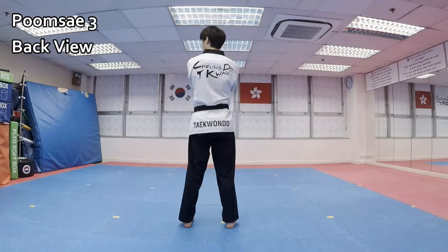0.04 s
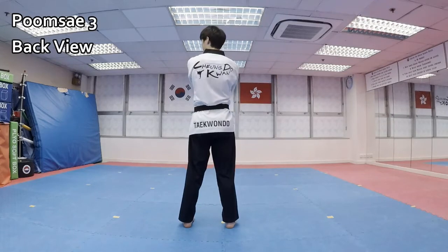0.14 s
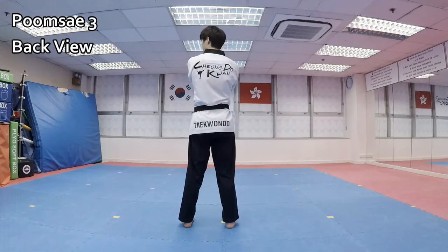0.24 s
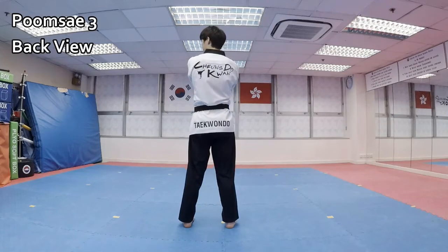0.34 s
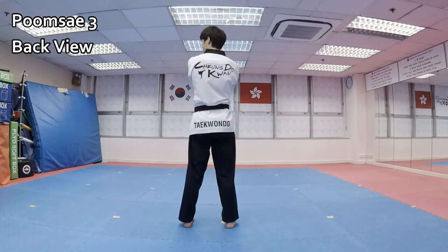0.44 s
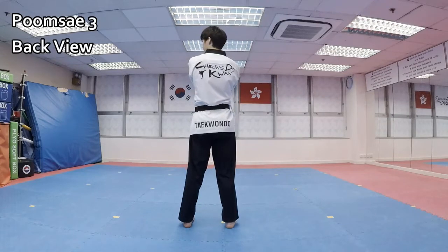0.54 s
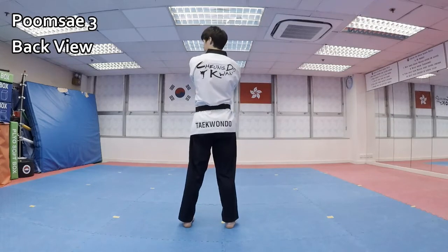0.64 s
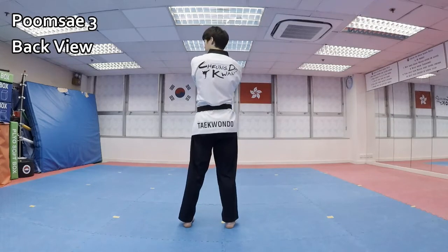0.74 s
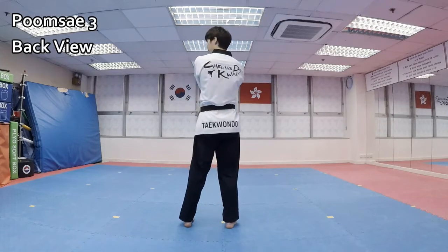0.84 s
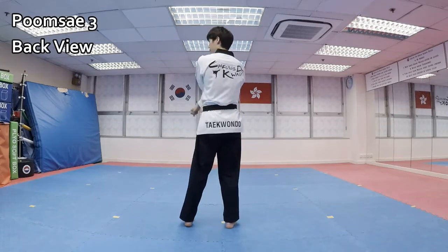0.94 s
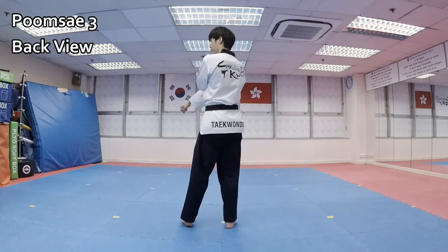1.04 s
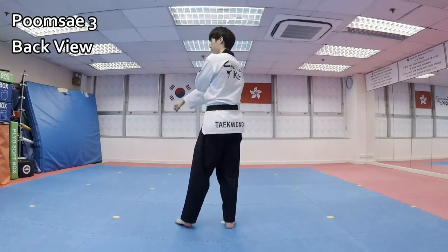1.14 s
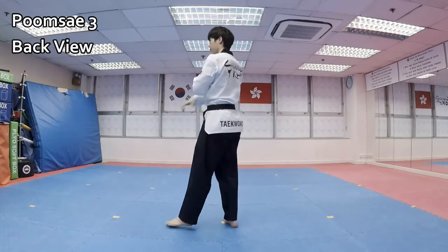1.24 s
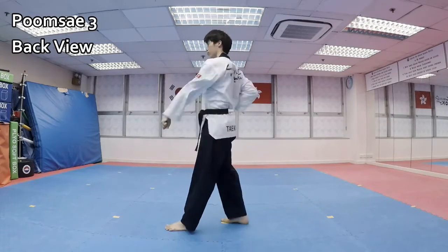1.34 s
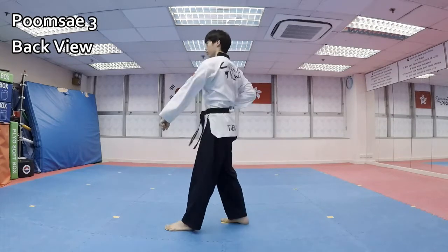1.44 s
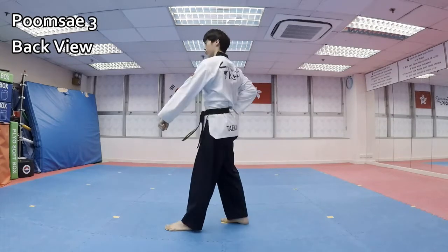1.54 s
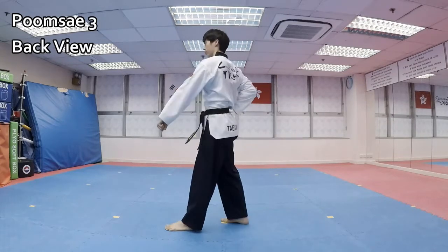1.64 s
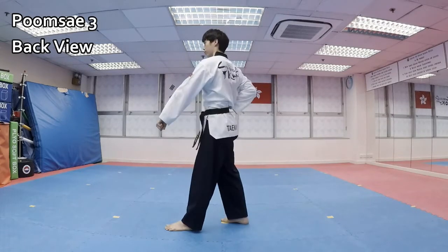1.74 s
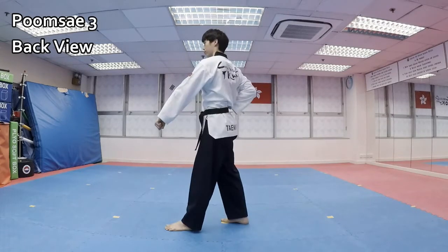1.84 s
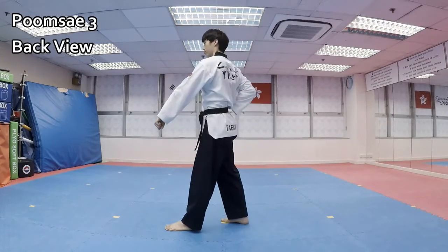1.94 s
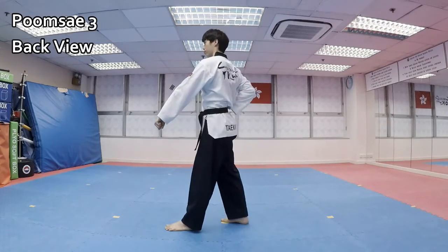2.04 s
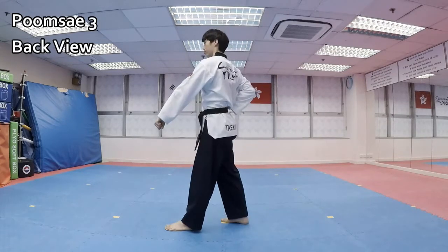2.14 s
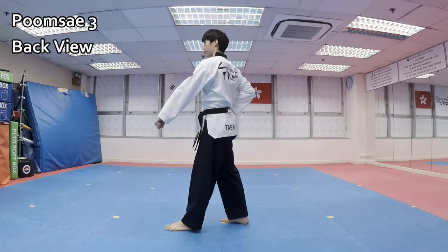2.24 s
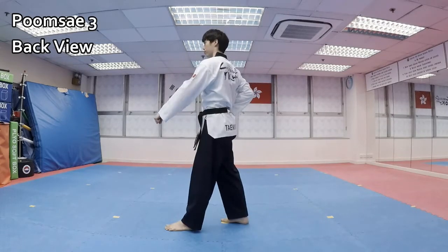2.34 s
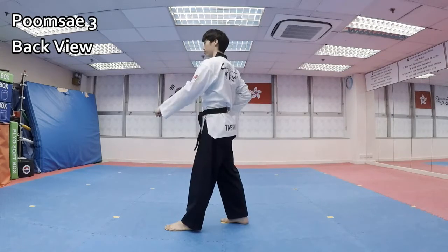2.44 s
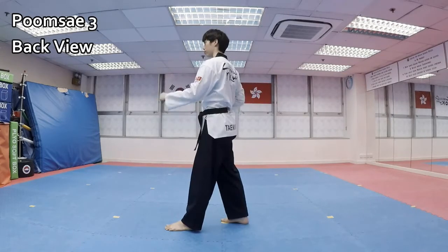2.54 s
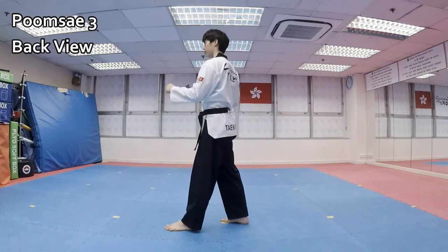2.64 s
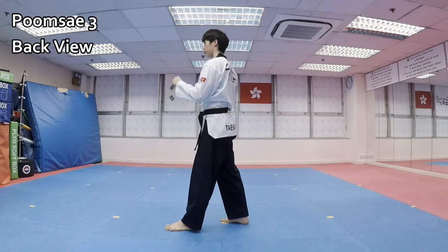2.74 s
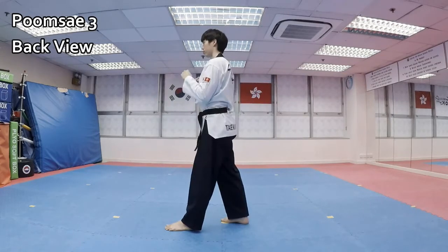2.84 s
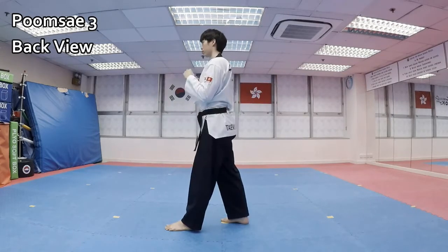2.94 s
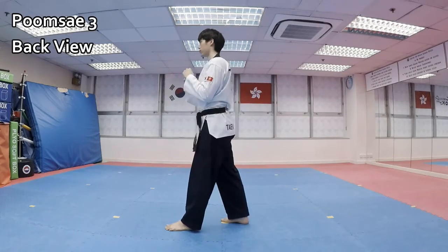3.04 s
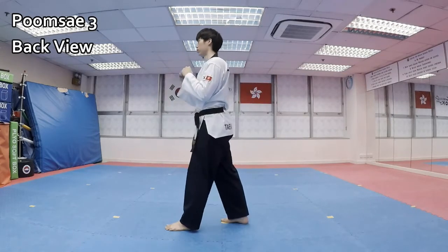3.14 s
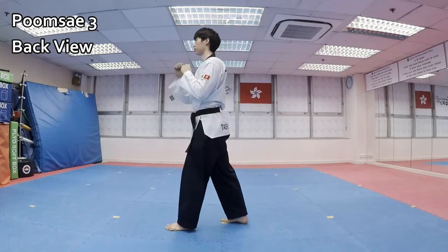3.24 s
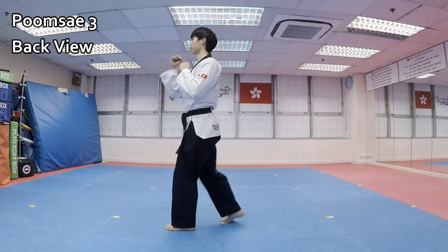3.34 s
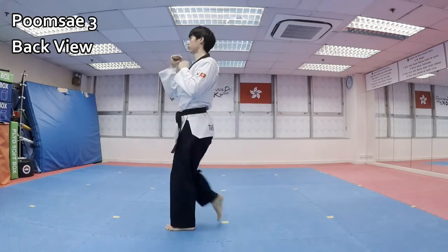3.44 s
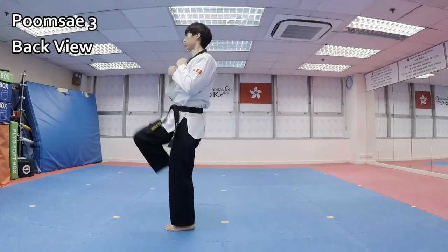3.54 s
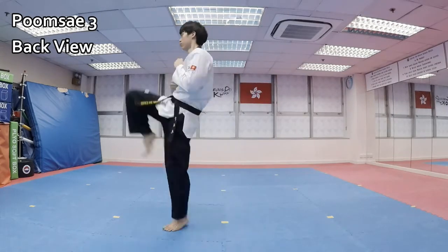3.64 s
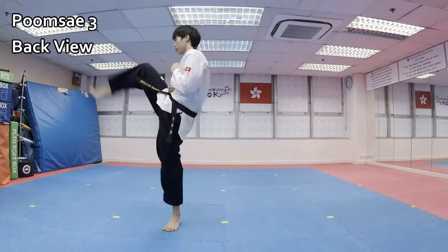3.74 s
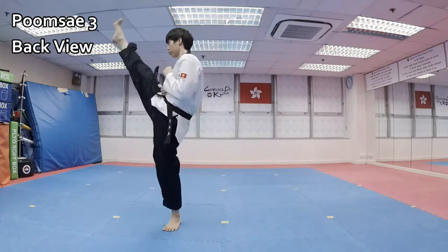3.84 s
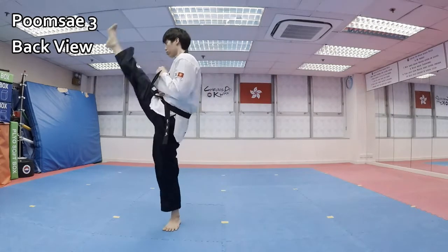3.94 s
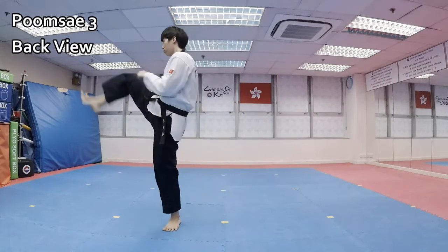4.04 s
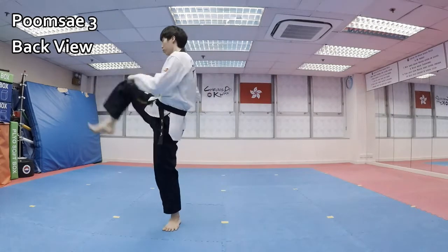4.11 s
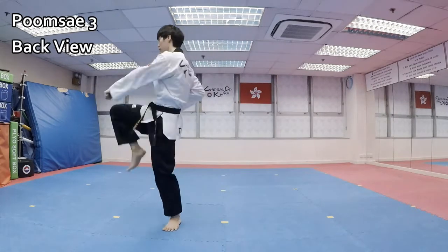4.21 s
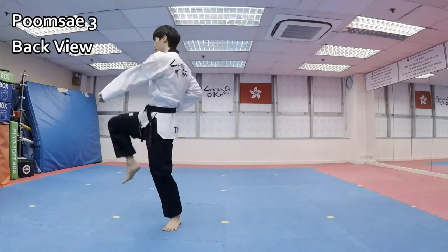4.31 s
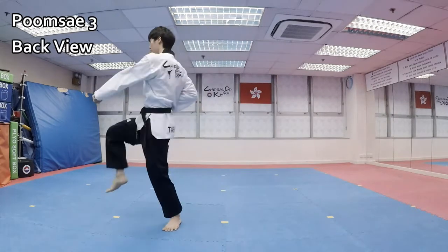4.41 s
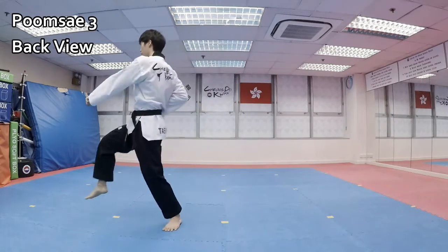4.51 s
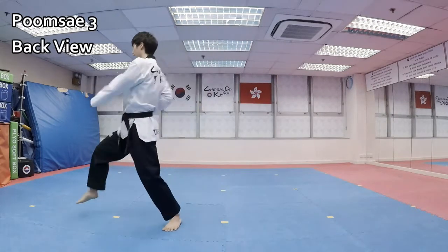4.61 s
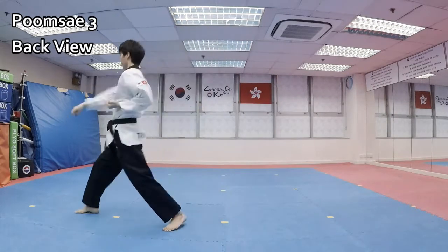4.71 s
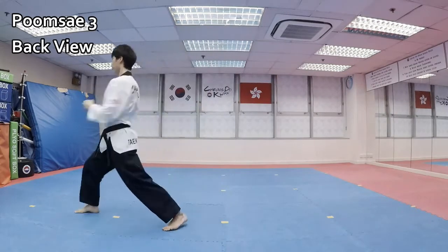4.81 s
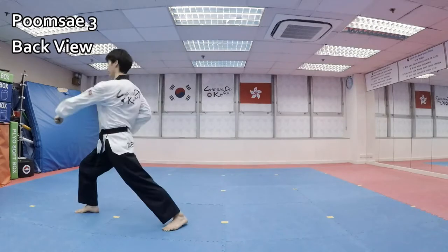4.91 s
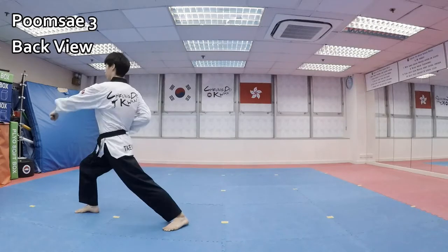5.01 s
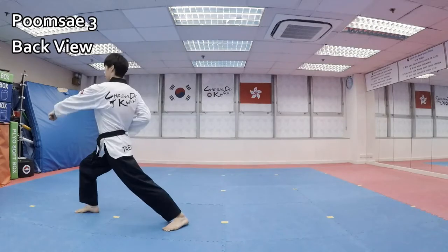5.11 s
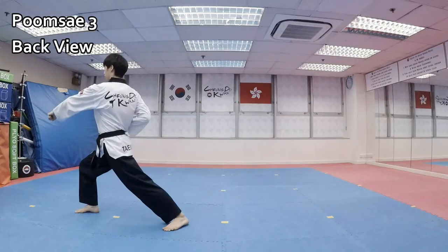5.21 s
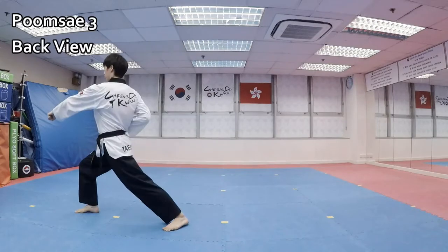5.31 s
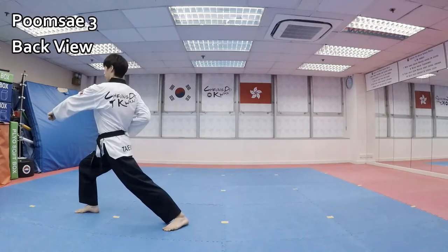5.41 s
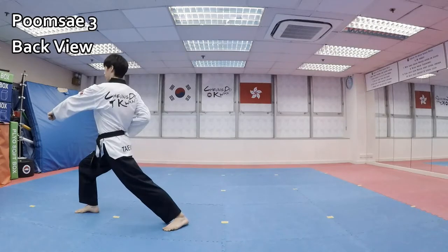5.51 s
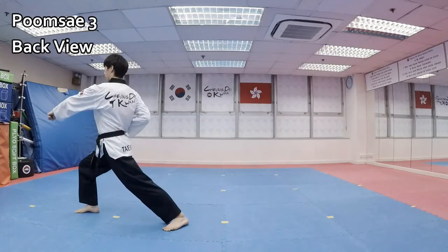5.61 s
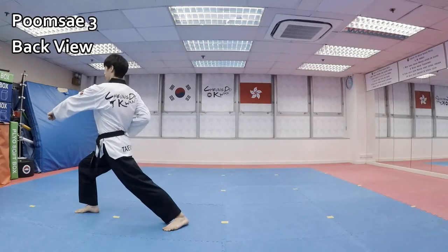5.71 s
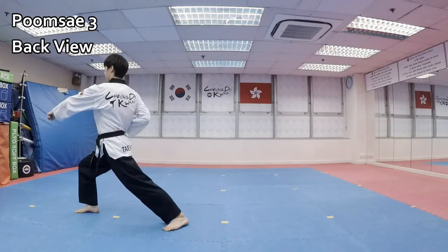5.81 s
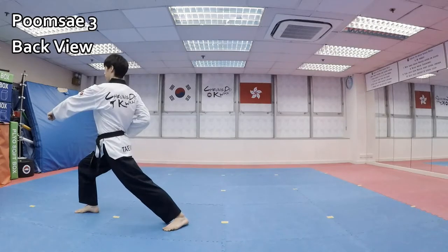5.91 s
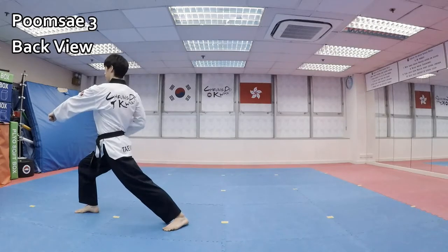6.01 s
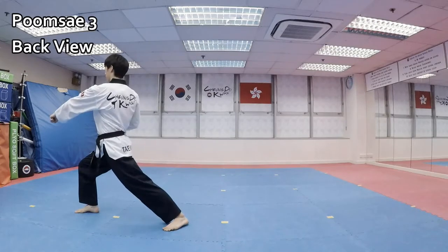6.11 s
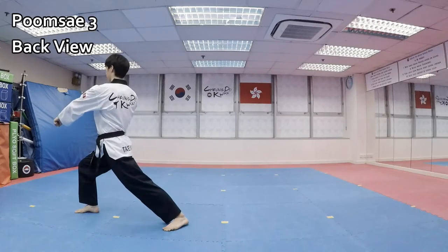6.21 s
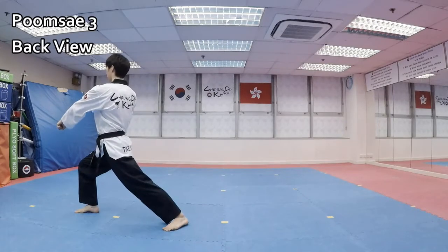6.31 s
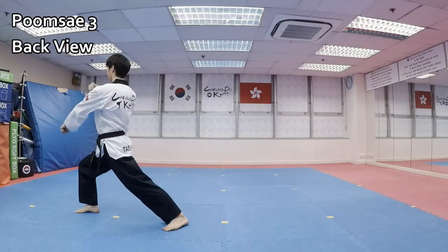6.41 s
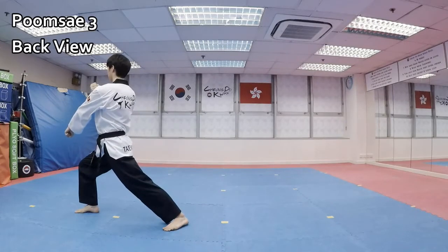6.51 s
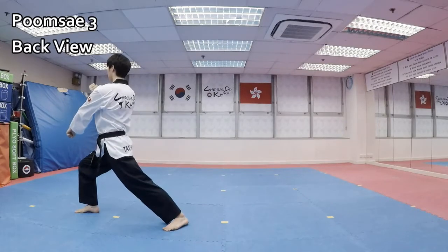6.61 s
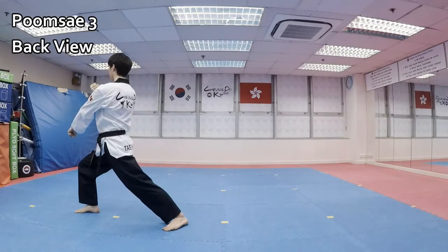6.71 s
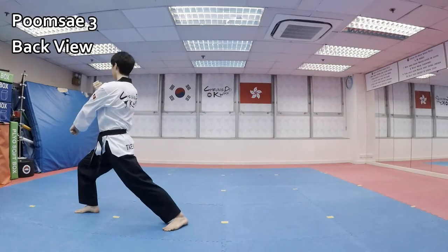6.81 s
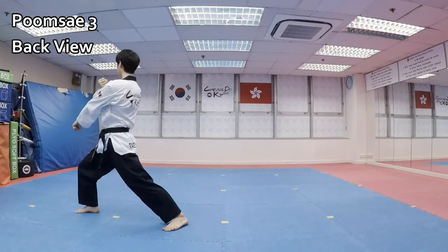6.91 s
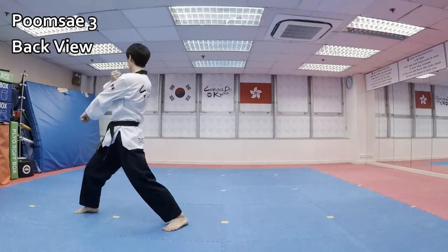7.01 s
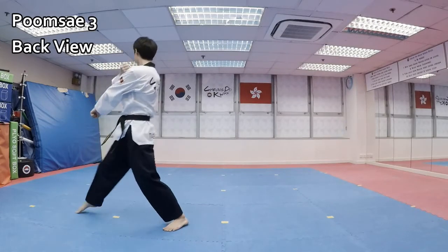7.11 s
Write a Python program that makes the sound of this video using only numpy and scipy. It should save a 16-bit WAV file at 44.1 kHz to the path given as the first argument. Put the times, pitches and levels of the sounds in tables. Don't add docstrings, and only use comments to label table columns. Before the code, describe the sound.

A small camera a few metres off hears heavy cotton cloth snapping, crackling and thumping softly against limbs: first a block, then a kick and a rapid cluster for the punch, and a last sharp flick at the end. Between them only tiny creases tick. A steady low boom of outside traffic swells and sinks under wavering engines and ventilation hiss, in a briefly reverberant room.

```python
import sys
import numpy as np
from scipy import signal
from scipy.fft import rfft, irfft, next_fast_len
from scipy.io import wavfile
from scipy.ndimage import map_coordinates

SR = 44100
rng = np.random.default_rng(int(sys.argv[2]) if len(sys.argv) > 2 else 0)


def decibels_to_gain(level_db):
    exponent = np.asarray(level_db, float) / 20
    return 10 ** exponent


def store_pcm(level_fs):
    pcm = np.round(np.clip(level_fs, -1, 1) * 32767).astype(np.int16)
    wavfile.write(sys.argv[1], SR, np.atleast_2d(pcm).T)


N = 315756

# fastest t/s, fade/s, rubbing level/dB, buckling level/dB
LIMB_STROKES = [(.875, .03, -50.5, -60), (1.04, 0.11, -51.5, -55), (1.13, 0.08, -56, -56),
                (1.203, 0.051, -47, -40), (1.264, 0.041, -37, -23), (1.295, 0.071, -39.5, -28.5),
                (2.99, .06, -50.5, -43.5), (3.06, 0.068, -61, -46), (3.2, .06, -48, -48.5),
                (3.36, .05, -50, -43), (3.47, 0.11, -45, -40), (3.569, 0.06, -39, -39),
                (3.63, 0.065, -48.5, -40), (3.689, 0.052, -42, -37), (3.756, 0.049, -48, -30),
                (3.81, 0.027, -47, -37), (3.861, 0.038, -37.5, -33), (4.052, 0.042, -49, -39.5),
                (4.14, .07, -52.5, -50.5), (4.31, 0.067, -61, -53), (4.46, 0.042, -54, -39.5),
                (4.606, 0.037, -58, -34), (4.68, 0.064, -34, -28.5), (4.75, 0.084, -44, -30.5),
                (4.88, 0.048, -49.5, -40.5), (5.02, 0.065, -59, -55), (5.96, 0.053, -56, -44.5),
                (6.99, 0.042, -48, -57), (7.099, 0.031, -35.5, -44), (7.155, .03, -45, -37)]
# f/Hz, level/dB per Hz
RUB_SPECTRUM = [(1200, -120), (2200, -5), (2900, -9), (3570, -2), (4900, -6), (6400, -1), (7800, -10),
                (10200, -22), (11100, -42), (14500, -32)]
# f/Hz, level/dB per Hz
CREASE_SPECTRUM = [(150, -120), (330, -23), (500, 0), (1050, -5.5), (1350, -6), (2200, -14), (3200, -20),
                   (7000, -120)]
# f/Hz, level/dB per Hz
FLAP_SPECTRUM = [(40, -120), (80, -3), (130, 1), (250, -2.5), (420, -2.5), (700, -17.5), (1500, -120)]
# t/s, tick level/dB, brightness/dB, pop level/dB, weave f/Hz
CLOTH_SNAPS = [(1.2002, -39, -14, -49, 3280), (1.2601, -23.5, -24, -22, 3440), (1.3293, -28, -5, -31, 4874),
               (3.1938, -47.5, -9, -31, 4270), (3.4, -48, -5, -33, 3548), (3.472, -37, -9, -39, 4400),
               (3.5203, -43, 2, -28.5, 3520), (3.5568, -21, -3.5, -24, 3478), (3.5934, -43, -11, -33, 3340),
               (3.7584, -51, -13, -26.5, 3075), (3.8031, -33, -20, -26, 5170), (3.8704, -33, 2, -24, 3200),
               (4.2927, -31.5, -5.5, -29, 3800), (4.4443, -37, -8, -35, 4586),
               (4.5916, -34, -6, -24.5, 3460), (4.6231, -35, -16, -26, 4270),
               (4.6462, -26.5, -16, -27, 3984), (4.6535, -25, -21, -25, 3560),
               (4.6662, -33, -23, -22, 3456), (4.6766, -28, -14, -30, 3480),
               (4.6917, -27.5, -2.5, -46, 3557), (4.7254, -42, 1, -27.5, 4150),
               (5.9551, -32, -7, -46, 4620), (7.088, -24, -3.5, -23.5, 4525)]
# t/s, tick level/dB, brightness/dB
CREASE_TICKS = [(0.885, -42, -6), (0.9596, -45, -3), (1.0253, -45, -2), (2.9702, -37.5, -24),
                (3.1427, -42, -7), (3.3402, -44, -6), (3.3666, -43, -9), (3.4837, -41, -4), (3.496, -40, 3),
                (4.0585, -39, -21), (4.0788, -41, -9), (4.3884, -42, -7), (4.4104, -38.5, -6),
                (4.4586, -40, 0.5), (4.4792, -40, -2), (4.9803, -43, -7), (5.027, -49, -2),
                (5.9721, -42, -12), (6.974, -55, 2), (6.989, -38.5, -3.5), (7.0155, -40.5, 1.5),
                (7.072, -40, -6), (7.094, -41.5, 13), (7.112, -44, 10), (7.126, -43, 9)]
# f/Hz, width/Hz, level/dB
FIBRE_MODES = [(6500, 1860, 2)]
# f/Hz, width/Hz, level/dB
POCKET_MODES = [(1086, 940, 0.5)]
# t/s, peak level/dB, f/Hz, t60/s
PANEL_THUMPS = [(1.262, -17, 221, 0.032), (1.299, -14.5, 247, 0.027), (3.747, -23.5, 286.5, 0.057),
                (3.556, -29.5, 190, 0.042), (3.772, -31, 367.3, 0.028), (3.789, -21.5, 290, 0.032),
                (4.734, -33, 250, 0.054), (4.764, -27, 426, 0.019), (4.876, -23, 421, 0.033),
                (1.265, -20.5, 512, 0.046), (1.283, -23.5, 732, 0.038), (1.335, -26.5, 850, 0.034),
                (3.472, -26.5, 490, 0.011), (3.751, -14, 485, 0.015), (4.048, -27, 693.6, 0.017),
                (4.681, -21, 924, 0.017), (4.719, -20, 520, 0.016), (4.738, -26, 1050, 0.027),
                (4.755, -24.5, 595, 0.024), (7.088, -26.5, 518, 0.021)]
# delay t/s, level/dB, left-right/dB
FIRST_ECHOES = [(.0063, -23.5, -18), (0.01, -32, 6), (0.015, -33, 9), (.021, -31, 6), (.036, -14.5, 0)]
# f/Hz, t60/s
HALL_T60 = [(100, 0.85), (400, 0.38), (1500, 0.38), (6000, 0.5), (12000, 0.76)]
# f/Hz, side minus mid level/dB
PORT_WIDTH = [(60, -29), (110, -5), (200, -9), (370, -4), (690, 3), (1260, 2.5), (2320, 0), (4260, -5.5),
              (7830, 2.5), (14400, -0.5)]
# start t/s, length/s, peak level/dB, f/Hz
AIR_SURGES = [(-.06, 0.22, -29, 46.7), (0.195, 0.33, -34, 52.6), (0.498, .16, -32.5, 44.8),
              (0.692, 0.26, -30, 45.2), (0.932, 0.57, -21, 50.5), (1.436, 0.13, -28.5, 49),
              (1.552, 0.11, -24.5, 49.8), (1.724, 0.5, -21.5, 49.9), (2.194, 0.34, -21, 50),
              (2.51, 0.16, -28.5, 49.77), (2.663, 0.18, -23.5, 50.7), (2.78, 0.73, -18.5, 48.85),
              (3.422, 0.34, -18.5, 48.27), (3.768, .43, -18, 50.55), (4.202, 0.14, -24.5, 51.1),
              (4.343, .12, -23, 52.6), (4.455, 0.24, -20, 51.7), (4.682, 0.29, -22, 50.67),
              (4.937, 0.6, -16, 50.6), (5.454, .45, -20.5, 49.5), (5.85, .46, -22.5, 49.25),
              (6.334, 0.33, -23.5, 50.5), (6.612, 0.36, -22.5, 51.8), (6.943, .1, -31, 53),
              (7.068, 0.24, -23.5, 53.4)]
# t/s, f/Hz
ENGINE_PITCH = [
    (0, 71),
    (1.3, 69),
    (1.9, 61),
    (2.6, 67.5),
    (4.2, 69.5),
    (4.4, 60.5),
    (5.8, 68.5),
    (7.16, 78),
]
# t/s, level/dB
ENGINE_EFFORT = [(0, -40.5), (1.2, -46.5), (1.5, -39), (1.8, -42), (2.6, -29), (3.0, -39), (3.25, -27),
                 (4.0, -33.5), (4.8, -34.5), (5.2, -38.5), (5.75, -26), (6.2, -24), (6.6, -43), (6.85, -29),
                 (7.16, -36)]
# t/s, f/Hz, level/dB
LORRY_ENGINE = [(0, 90, -57), (.65, 90, -66), (.84, 89.3, -35), (1.05, 90, -51.5), (4.4, 91, -51.5),
                (4.8, 92, -39), (5.7, 88.5, -50), (6.3, 88.7, -34.5), (7.16, 93.3, -43)]
# t/s, f/Hz, level/dB
BRAKE_SQUEAL = [
    (.4, 2380, -83),
    (.55, 2402, -70),
    (.9, 2434, -65.5),
    (1.05, 2400, -83),
]
# t/s, rumble level/dB, hiss level/dB
BACKGROUND_LEVELS = [(0, -34.5, -50), (1, -35, -50), (2, -33.5, -49.5), (3, -32, -48.5), (4, -34.5, -48),
                     (5, -30.5, -49), (6, -35, -47.5), (6.6, -28.5, -47.5), (7.16, -30.5, -45)]
# f/Hz, level/dB per Hz
RUMBLE_SPECTRUM = [(10, -35), (27, 9), (40, -2.5), (60, -4), (90, -5), (125, -8), (175, -13), (250, -24),
                   (330, -38), (600, -120)]
# f/Hz, width/Hz, level/dB per Hz
FAN_TONES = [(101.6, 5.2, -2.5), (148, 5.3, -2.5), (223.1, 29.4, -14)]
# f/Hz, level/dB per Hz
AIR_SPECTRUM = [(150, -42), (255, -1), (470, -9.5), (510, -8.5), (650, -12.5), (1030, -16), (1150, -13),
                (1560, -21), (2470, -24.5), (4900, -32), (6400, -29), (10500, -34), (13400, -44.5),
                (14800, -41.5)]


def unit(x):
    return x / np.std(x)


def along(points, f_hz):
    f, v = np.transpose(points)
    return np.interp(np.log(f_hz + 1), np.log(f + 1), v)


def curves(rows):
    t_s, *columns = np.transpose(rows)
    return [np.interp(np.arange(N) / SR, t_s, c) for c in columns]


def slow(shape):
    t_s = np.arange(0, N / SR + .001, .001)
    return np.interp(np.arange(N) / SR, t_s, shape(t_s))


def wobble(rate_hz):
    return map_coordinates(rng.standard_normal(N // 400), [np.arange(N) * rate_hz / SR])


def filtered(x, response):
    m = next_fast_len(N + 8192)
    return irfft(rfft(x, m) * response(np.fft.rfftfreq(m, 1 / SR)), m)[..., :N]


def resonances(modes):
    def response(f):
        total = 0
        for k, (f_hz, width_hz, db) in enumerate(modes):
            damping = 1j * f * width_hz
            total = total + (-1) ** k * decibels_to_gain(db) * damping / (f_hz ** 2 - f * f + damping)
        return total
    return response


def diffuse(gain):
    noise = rng.standard_normal((2, N))
    mid, side = filtered(noise, lambda f: gain(f) * decibels_to_gain([0 * f, along(PORT_WIDTH, f)]))
    return np.array([mid + side, mid - side]) / np.std(mid)


def stroke(t_peak_s, fade_s, db, run_up):
    def level(t):
        fades = np.maximum((t_peak_s - t) / run_up, t - t_peak_s) / fade_s
        return np.sum(decibels_to_gain(db - 9.5 * fades), axis=0)
    return slow(level)


def crackle(spectrum, rate_hz, spread_db, clump_db):
    size = decibels_to_gain(spread_db * np.minimum(rng.exponential(size=N), 3.5))
    clicks = (rng.random(N) < rate_hz / SR) * rng.standard_normal(N) * size
    clumped = clicks * decibels_to_gain(clump_db * wobble(45))
    return unit(filtered(clumped, lambda f: decibels_to_gain(along(spectrum, f))))


def rustle():
    t_s, fade_s, rub_db, fold_db = np.transpose(LIMB_STROKES)[..., None]
    sudden = 0.3
    flap_fade_s, flap_db = 1.38 * fade_s, fold_db - 2
    rubbing = stroke(t_s, fade_s, rub_db, 0.66) * crackle(RUB_SPECTRUM, 4000, 1.45, 2.0)
    buckling = stroke(t_s, fade_s, fold_db, sudden) * crackle(CREASE_SPECTRUM, 4000, 1.6, 1.44)
    flapping = stroke(t_s, flap_fade_s, flap_db, sudden) * crackle(FLAP_SPECTRUM, 900, 2.1, 2.0)
    return decibels_to_gain(-3.5) * (rubbing + buckling + flapping)


def snaps():
    weave, fibre_pulls, pocket_pulls = np.zeros((3, N + SR))
    t = np.arange(SR // 200) / SR
    tick_hz = 3650 * np.exp(0.17 * rng.standard_normal(len(CREASE_TICKS)))
    rows = list(CLOTH_SNAPS)
    for (t_s, db, bright_db), f_hz in zip(CREASE_TICKS, tick_hz):
        rows.append((t_s, db, bright_db, db - 2, f_hz))
    slips = rng.random((len(rows), 2, 3))
    for (t_s, tick_db, bright_db, pop_db, f_hz), (late, size) in zip(rows, slips):
        decay = decibels_to_gain(tick_db + 12.0 - 60 * t / 0.0023)
        ring = decay * (1 - np.exp(-t / 0.00017)) * np.sin(2 * np.pi * f_hz * t)
        times = np.int_(np.append(t_s + 0.001042, t_s + 0.001242 + .0012 * late) * SR)
        sizes = np.append(-1, 0.58 * (2 * size - 1))
        for at, share in zip(times, sizes):
            weave[at:at + len(t)] += share * ring
        fibre_pulls[times] = decibels_to_gain(tick_db + bright_db + 26.0) * sizes
        pocket_pulls[times[0]] = -decibels_to_gain(pop_db + 30.5)
    fibres = filtered(fibre_pulls[:N], lambda f: resonances(FIBRE_MODES)(f) ** 2)
    pops = filtered(pocket_pulls[:N], lambda f: resonances(POCKET_MODES)(f) ** 2)
    return filtered(weave[:N] + fibres + pops, lambda f: 1 / (1 + (f / 9000) ** 6))


def thumps():
    out, t = np.zeros(N + SR), np.arange(SR // 10) / SR
    for t_s, db, f_hz, t60_s in PANEL_THUMPS:
        swing = decibels_to_gain(db + 7.5 - 60 * t / t60_s) * (1 - np.exp(-t / 0.0015))
        cycles = np.sin(2 * np.pi * f_hz * t) + 0.39 * np.sin(2 * np.pi * 1.51 * f_hz * t)
        out[round(t_s * SR):][:len(t)] += swing * cycles
    return out[:N]


def hall(x, wet_db):
    f_hz, t, z = signal.stft(diffuse(np.ones_like)[:, :SR], SR, nperseg=256)
    decay = decibels_to_gain(-60 * t / along(HALL_T60, f_hz)[:, None])
    tail = signal.istft(z * decay, SR, nperseg=256)[1]
    tail *= 1 - np.exp(-np.arange(tail.shape[1]) / SR / 0.0041)
    tail *= decibels_to_gain(wet_db) / np.linalg.norm(tail.mean(axis=0))
    for delay_s, db, pan_db in FIRST_ECHOES:
        tail[:, round(delay_s * SR)] += decibels_to_gain([db + pan_db / 2, db - pan_db / 2])
    return x + signal.fftconvolve(x.mean(axis=0)[None], tail, axes=1)[:, :N]


def drone(f_hz, level, waver_hz, lead_rad):
    phase = 2 * np.pi * np.cumsum(f_hz + waver_hz * wobble(12)) / SR
    return np.sqrt(2) * level * np.sin([phase + lead_rad, phase - lead_rad])


def boom():
    start_s, length_s, db, pitch_hz = np.transpose(AIR_SURGES)[..., None]

    def surges(t):
        arch = np.abs(np.sin(np.pi * np.clip((t - start_s) / length_s, 0, 1)))
        return np.sum(decibels_to_gain(db) * arch ** 0.64, axis=0)

    swell = slow(surges)
    f_hz, = curves(np.hstack([start_s + length_s / 2, pitch_hz]))
    return drone(f_hz, swell * decibels_to_gain(1.4 * wobble(18)), 0.87, 0.059) * decibels_to_gain([[.2], [-.2]])


def engines():
    (car_hz,), (car_db,) = curves(ENGINE_PITCH), curves(ENGINE_EFFORT)
    lorry_hz, lorry_db = curves(LORRY_ENGINE)
    brake_hz, brake_db = curves(BRAKE_SQUEAL)
    car = drone(car_hz, decibels_to_gain(car_db + 2.15 * wobble(9)), 0.91, 0.061)
    lorry = drone(lorry_hz, decibels_to_gain(lorry_db + 3 * wobble(6.9)), 1.28, .1)
    brake = drone(brake_hz, decibels_to_gain(brake_db + 2.9 * wobble(14)), 16.6, 0.44)
    return car + lorry + brake


def fans(f):
    return sum(decibels_to_gain(db) / (1 + ((f - f_hz) / width_hz * 2) ** 2) for f_hz, width_hz, db in FAN_TONES)


def background():
    rumble_db, hiss_db = curves(BACKGROUND_LEVELS)
    rumble = diffuse(lambda f: np.hypot(decibels_to_gain(along(RUMBLE_SPECTRUM, f)), fans(f)))
    rumble *= decibels_to_gain(rumble_db + 1.8 * wobble(3.22))
    air = diffuse(lambda f: decibels_to_gain(along(AIR_SPECTRUM, f)))
    air *= decibels_to_gain(hiss_db + 0.12 * wobble(0.85))
    return boom() + engines() + rumble + air


def scene():
    across = 0.026 + 0.34 * wobble(90)
    cloth = rustle() * np.array([1 + across, 1 - across])
    hits = (snaps() + thumps()) * decibels_to_gain([[.4], [-.4]])
    return hall(cloth + hits, wet_db=-4) + background()


def low_pass(x):
    return signal.sosfilt(signal.butter(12, 14990, fs=SR, output="sos"), x)


def record(dry):
    top_hz = 14800
    mix = filtered(dry, lambda f: f < top_hz)
    return low_pass(mix)


dry = scene()
out = record(dry)
store_pcm(out)
```